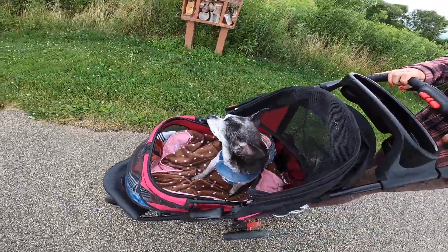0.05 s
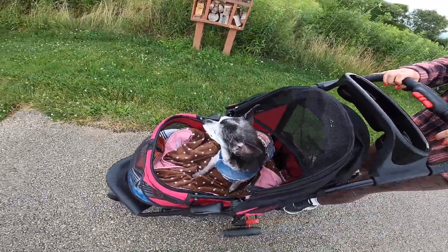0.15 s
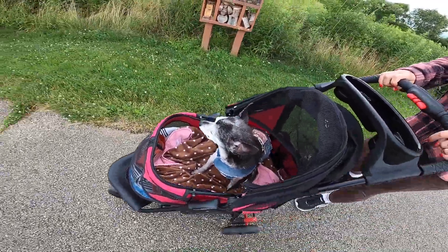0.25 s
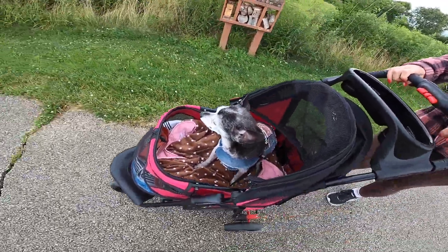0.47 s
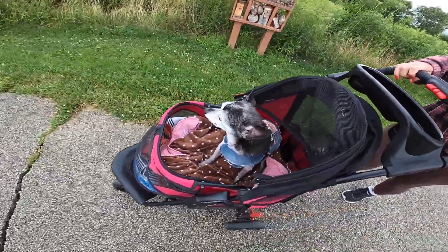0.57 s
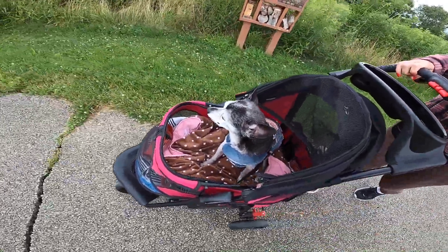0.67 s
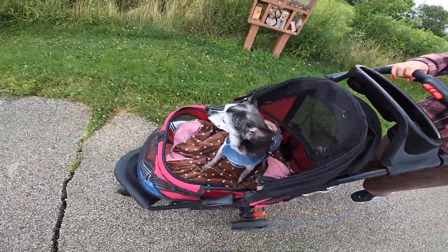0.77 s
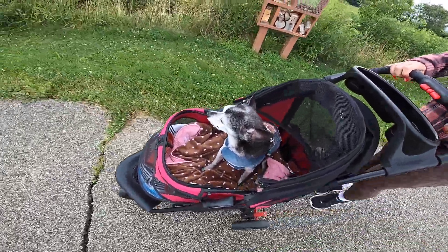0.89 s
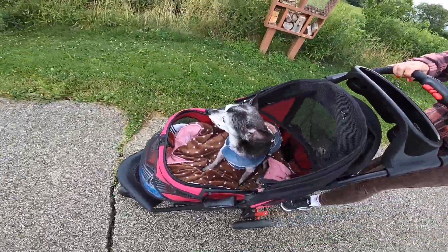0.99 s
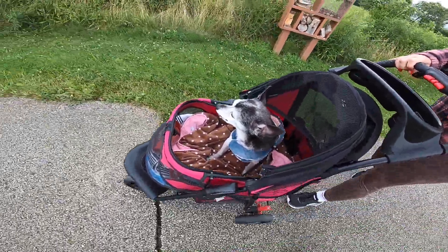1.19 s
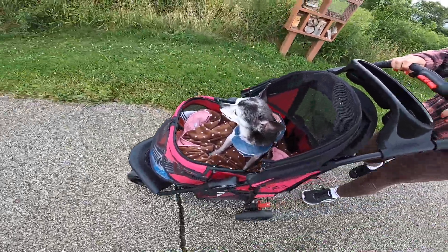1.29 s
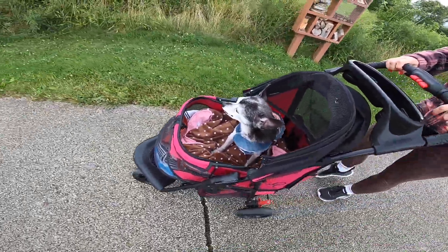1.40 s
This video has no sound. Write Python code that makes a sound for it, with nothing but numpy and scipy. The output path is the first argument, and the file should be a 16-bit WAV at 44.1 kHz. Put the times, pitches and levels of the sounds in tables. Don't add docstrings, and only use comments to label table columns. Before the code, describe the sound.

Light stroller rolling over gritty pavement beside a meadow, heard close and dry on a hand-held microphone: early footstep and insect pulses, a brief bird whistle midway, then wind thumps, rattling ticks, chirps and a duller footfall.

```python
import sys
import numpy as np
from scipy import signal
from scipy.fft import rfft, irfft
from scipy.io import wavfile
from scipy.ndimage import uniform_filter1d, map_coordinates

SR = 44100
rng = np.random.default_rng(int(sys.argv[2]) if len(sys.argv) > 2 else 0)


def invert_db(x):
    u = np.asarray(x, float) / 20
    return 10 ** u


def persist_wave(psi):
    counts = np.round(np.clip(psi, -1, 1) * 32767).astype(np.int16)
    wavfile.write(sys.argv[1], SR, np.atleast_2d(counts).T)


N = 63945

# frequency in Hz, level in dB per Hz.
AIR_COLOUR = [(150, -4.5), (250, 5.5), (313, 0), (897, -16), (1530, -10.5), (5040, -23), (11300, -28),
              (13500, -38.5), (15700, -39)]

# time in seconds, strength in dB, air speed in octaves.
GUSTS = [(0, -35, -0.55), (.185, -43, -0.47), (.235, -32.5, 1.03), (.29, -35, -0.22), (.32, -26.5, 0.48),
         (.44, -26.5, -0.12), (.495, -29.5, 0.21), (.63, -42, -0.23), (.72, -32, -0.23),
         (.755, -12.5, 0.23), (.79, -24.5, 0.55), (.82, -31, -0.24), (.915, -48.5, 0.35),
         (.98, -18, -0.076), (1.05, -20, 1.078), (1.065, -21.5, -0.38), (1.14, -34, -0.42),
         (1.23, -53.5, -0.21)]
# time in seconds, half width in seconds, change in dB.
PUFFS = [(.06, 0.018, -2), (.112, 0.01, 5.5), (0.269, 0.012, -11), (.345, .008, -6), (0.369, 0.0081, 4),
         (0.407, 0.011, -16.5), (0.449, 0.02, 4.5), (.53, 0.015, -2.5), (.595, .012, 1.5),
         (.65, .015, -2.5), (0.701, 0.013, 5.5), (0.737, 0.0071, -11), (.855, 0.017, -7), (.955, .012, 0.5),
         (1.066, 0.0092, -2.5), (1.106, 0.029, 3.5), (1.195, 0.0076, 4.5), (1.33, 0.024, 7.5),
         (1.4, .02, 2)]
# frequency in Hz, level in dB per Hz.
EDDY_COLOUR = [(8, -41), (28, 5), (60, -0.5), (140, -2.5), (260, -16.5), (400, -34.5), (600, -48)]

# time in seconds, level in dB.
INSECT_LEVEL = [
    (0, -70.5),
    (.3, -68),
    (.55, -72.5),
    (.8, -78),
    (1.45, -77),
]
# start in seconds, length in seconds, level in dB.
NEAR_CHIRPS = [
    (0, .014, -57.5),
    (.028, .036, -59.5),
]
# frequency in Hz, level in dB per Hz.
WING_COLOUR = [(8500, -21), (10200, -5.5), (11300, -5), (13200, -12), (14500, -44)]

# start in seconds, level in dB, level of the rising part in dB.
TRILL = [(.029, -56, -60), (.1, -54.5, -58), (.175, -54, -57), (.245, -59, -61), (.321, -60, -62),
         (.396, -61, -68)]
# time in seconds, pitch in Hz.
TRILL_FALL = [(0, 5450), (.008, 5100), (.015, 4450)]
# time in seconds, pitch in Hz.
TRILL_RISE = [(.016, 4900), (.021, 6000), (.025, 6700), (.036, 6900), (.042, 7300), (.048, 8000),
              (.051, 8100)]
# start in seconds, length in seconds, first Hz, last Hz, level in dB.
WHISTLES = [(.613, .012, 1900, 1950, -53), (.97, .01, 3900, 3800, -48), (.093, .028, 4300, 3050, -55),
            (.596, .022, 3100, 3800, -54), (.642, .016, 2300, 2750, -45), (.733, .014, 6000, 6700, -59),
            (.884, .038, 2250, 2200, -50), (.9, .14, 7580, 7400, -67), (.933, .012, 3700, 5150, -40),
            (.9425, .006, 5050, 3600, -41), (1.014, .016, 6100, 4500, -58), (1.066, .028, 7100, 7050, -66),
            (1.074, .052, 3750, 5150, -49), (1.142, .009, 5300, 4600, -52), (1.198, .028, 6350, 4500, -51),
            (1.27, .058, 3700, 5200, -51), (1.343, .01, 5900, 4000, -54), (1.397, .027, 6400, 4700, -56)]
# time in seconds, pitch in Hz, level in dB.
LONG_NOTE = [(.517, 4800, -66), (.528, 4620, -58), (.538, 4520, -52), (.558, 4530, -51), (.58, 4510, -61),
             (.59, 4440, -74)]

# start in seconds, peak in dB, brightest frequency in Hz.
KNOCKS = [
    (.1972, -31, 1590),
    (.2092, -24, 1560),
    (1.289, -32.5, 795),
]
# frequency in Hz, level in dB, time to die by 60 dB in seconds.
SOLE_RING = [(776, -5, 0.068), (1195, -7, .015), (1520, .5, 0.028), (1940, 0.5, 0.013), (2410, 1, 0.013),
             (3330, -0.5, 0.016), (5300, -1.5, 0.018)]
# start in seconds, length in seconds, level in dB.
SCUFFS = [
    (0.173, 0.12, -42.5),
    (1.28, 0.09, -44),
    (0.015, 0.18, -48.5),
]
# frequency in Hz, level in dB per Hz.
DRAG_COLOUR = [(70, -21), (180, 19), (400, -7.5), (780, 3), (1150, -4.5), (2200, -7.5), (5000, -44),
               (8000, -54)]

# start in seconds, peak in dB,
# pitch in Hz.
TICKS = [(.0044, -33, 1650), (0.0279, -37.5, 1360), (.034, -37, 1520), (0.1417, -40, 2090),
         (.169, -43, 5370), (0.1724, -34, 1770), (0.178, -39, 1560), (0.1877, -28.5, 2120),
         (0.2031, -36, 1580), (0.21, -37.5, 5300), (0.212, -33.5, 3000), (0.226, -46, 6440),
         (0.2316, -26, 2260), (0.2422, -39, 1950), (0.2533, -28.5, 2280), (0.2633, -36, 2070),
         (0.272, -40, 1710), (0.275, -44, 3500), (0.2784, -35, 2410), (0.4327, -40, 2190),
         (.4774, -40.5, 3270), (.624, -37.5, 3520), (0.631, -34.5, 3700), (.6707, -31, 2850),
         (.672, -46, 7800), (0.6813, -38, 4240), (0.692, -39, 3360), (0.6986, -30.5, 3660),
         (.7, -42.5, 8300), (0.7147, -29.5, 4160), (.716, -35.5, 1940), (0.7172, -44, 8500),
         (0.7305, -28.5, 4000), (0.7344, -34, 3640), (.7979, -39.5, 2100), (0.817, -40.5, 3820),
         (0.8243, -35.5, 3650), (.826, -44.5, 7940), (.829, -37, 4150), (0.833, -37, 3820),
         (0.8456, -34, 4130), (0.872, -46, 4000), (.919, -48, 3700), (.928, -40, 1660), (.9464, -36, 2400),
         (.953, -31, 3960), (0.968, -34, 3830), (.993, -36, 4230), (1.0379, -37, 3200),
         (1.051, -38.5, 4650), (1.066, -35, 3530), (1.074, -34, 2940), (1.089, -32.5, 3784),
         (1.1142, -31, 3500), (1.116, -34, 2190), (1.1435, -33, 3720), (1.158, -33.5, 2501),
         (1.175, -30, 3358), (1.202, -34.5, 4200), (1.225, -41, 2600),
         (1.289, -40, 2400), (1.297, -36, 1800), (1.313, -26, 3250), (1.313, -31, 1200),
          (1.3135, -41, 5600), (1.3155, -33, 2700), (1.317, -33, 1600), (1.349, -38, 2240),
          (1.358, -36, 1900), (1.364, -34, 1600), (1.387, -38, 2050), (1.424, -40, 2200)]
# start in seconds, peak in dB, pitch in Hz.
BUMPS = [(.212, -43, 760), (.615, -44.5, 327), (.794, -35, 547), (.83, -43, 480), (.87, -40.5, 451.1),
         (1.034, -40, 600), (1.044, -32, 607), (1.288, -46.5, 320), (1.31, -42, 337)]

# time in seconds, load in dB.
WHEEL_LOAD = [(0, -52), (.1, -59), (.3, -57.5), (.52, -64), (.59, -81), (.625, -50.5), (.735, -52.5),
              (.755, -53.5), (.81, -54.5), (.83, -46), (.92, -50.5), (.95, -50), (1, -51.5), (1.02, -58),
              (1.08, -50), (1.18, -47.5), (1.25, -53.5), (1.45, -53.5)]
# frequency in Hz, level in dB per Hz.
TYRE_COLOUR = [(410, -77), (700, 2.5), (1370, -2), (2160, 0.5), (2990, -1.5), (4070, -1.5), (5860, -10),
               (8420, -13.5), (15700, -46)]


def unit(x):
    return x / np.sqrt(np.mean(x ** 2) + 1e-20)


def curves(rows):
    s, *cols = np.transpose(rows)
    return [np.interp(np.arange(N) / SR, s, c) for c in cols]


def wobble(rate):
    return map_coordinates(rng.standard_normal(N // 50), [np.arange(N) * rate / SR])


def rush(spectrum, patchy_db):
    z = signal.stft(rng.standard_normal(N + 8192), nperseg=256)[2]
    field = uniform_filter1d(rng.standard_normal(z.shape), size=5, axis=0)
    field = uniform_filter1d(field, size=5, axis=1)
    x = signal.istft(z * invert_db(patchy_db * unit(field)), nperseg=256)[1]
    f, db = np.transpose(spectrum)
    hz = np.fft.rfftfreq(len(x), 1 / SR)
    colour = invert_db(np.interp(np.log(hz + 1), np.log(f + 1), db, -120, -120))
    return unit(irfft(rfft(x) * colour, len(x))[:N])


def add(out, s, sound):
    part = out[max(round(s * SR), 0):][:len(sound)]
    part += sound[:len(part)]


def swells(rows):
    out = np.zeros(N)
    for s, length, db in rows:
        add(out, s, invert_db(db) * np.hanning(round(length * SR)) ** 0.25)
    return out


def whistle(points, late=1, soft=0.72):
    s, hz = np.transpose(points)
    t = np.arange(s[0], s[-1], 1 / SR)
    swell = np.abs(np.sin(np.pi * np.linspace(0, 1, len(t)) ** late)) ** soft
    return np.sqrt(2) * swell * np.sin(2 * np.pi * np.cumsum(np.interp(t, s, hz)) / SR)


def still_air():
    return invert_db(-53.5) * rush(AIR_COLOUR, patchy_db=3.0)


def wind():
    trim_db, eddy_rate, eddy_db = 0.5, 35, 2.5
    membrane_top = 0.38
    gust_db, speed = curves(GUSTS)
    t = np.arange(N) / SR
    for s, width, db in PUFFS:
        gust_db = gust_db + db * np.exp(-((t - s) / width) ** 2)
    frozen = rush([(4 * hz, db) for hz, db in EDDY_COLOUR], patchy_db=0)
    place = np.cumsum(2 ** np.clip(speed, -2, 2)) / 4
    gain = invert_db(gust_db + trim_db + eddy_db * wobble(eddy_rate))
    push = gain * map_coordinates(frozen, [place])
    return membrane_top * np.tanh(push / membrane_top)


def insect():
    pulses_per_s, first_s, sharpness = 23.2, .024, 2
    level_db, = curves(INSECT_LEVEL)
    t = np.arange(N) / SR
    beat = np.abs(np.cos(np.pi * pulses_per_s * (t - first_s))) ** sharpness
    return (invert_db(level_db) * beat + swells(NEAR_CHIRPS)) * rush(WING_COLOUR, patchy_db=1.5)


def long_whistle():
    note_hz, note_db = curves([(0, 4800, -120)] + LONG_NOTE + [(.6, 4440, -120)])
    start_s = LONG_NOTE[0][0]
    inside, = curves([(start_s - .002, 0), (start_s, 1)])
    return np.sqrt(2) * inside * invert_db(note_db) * np.sin(2 * np.pi * np.cumsum(note_hz) / SR)


def birds():
    trim_db, echo_db, echo_t60_s = -0.5, -12, .15
    calls, u = np.zeros(N), np.linspace(0, 1, 12)
    for s, fall_db, rise_db in TRILL:
        add(calls, s, invert_db(fall_db) * whistle(TRILL_FALL))
        add(calls, s + TRILL_RISE[0][0], invert_db(rise_db) * whistle(TRILL_RISE, soft=.3))
    for s, length, first, last, db in WHISTLES:
        settles = 0 <= first - last < 400
        bend, late = (.3, .8) if settles else (1.9, 1.25)
        points = np.transpose([u * length, first + (last - first) * u ** bend])
        add(calls, s, invert_db(db + trim_db) * whistle(points, late))
    song = long_whistle() + calls * invert_db(1.8 * wobble(150))
    t = np.arange(SR // 5) / SR
    tail = rng.standard_normal(len(t)) * invert_db(-60 * t / echo_t60_s)
    echo = signal.fftconvolve(song, tail / np.linalg.norm(tail))[:N]
    return song + invert_db(echo_db) * echo


def steps():
    crack_share, crack_t60_s = 1.1, 0.049
    focus_db = 6
    out, t = np.zeros(N), np.arange(SR // 10) / SR
    grit = rush(DRAG_COLOUR, patchy_db=0) + .35 * rush(TYRE_COLOUR, patchy_db=0)
    for s, db, bright_hz in KNOCKS:
        ring = np.zeros(len(t))
        for hz, mode_db, t60 in SOLE_RING:
            mode_db = mode_db - focus_db * abs(np.log2(hz / bright_hz))
            ring += invert_db(mode_db - 60 * t / t60) * np.sin(2 * np.pi * hz * t)
        crack = crack_share * grit[round(s * SR):][:len(t)] * invert_db(-9 - 60 * t / crack_t60_s)
        add(out, s, invert_db(db) * (1 - np.exp(-t / .0007)) * (ring + crack))
    drag = swells(SCUFFS) * invert_db(2.5 * wobble(120)) * rush(DRAG_COLOUR, patchy_db=1.2)
    return out + drag


def ticks():
    ring_share, ring_t60_s = .45, .013
    crack_share, crack_t60_s = .5, .012
    pitch_spread, smear_s = .14, .0014
    out, t, grit = np.zeros(N), np.arange(SR // 40) / SR, rush(TYRE_COLOUR, patchy_db=1)
    for s, db, hz in TICKS + BUMPS:
        scatter = pitch_spread * np.linspace(-1, 1, 4) + .05 * rng.standard_normal(4)
        pitch = hz * np.exp(scatter)[:, None]
        age = np.maximum(t - smear_s * rng.random((4, 1)), 0)
        fade = (1 - np.exp(-age / .0003)) * invert_db(-60 * age / ring_t60_s * np.sqrt(hz / 2500))
        ring = ring_share * (fade * np.sin(2 * np.pi * pitch * age)).sum(0)
        puff = (1 - np.exp(-t / .0005)) ** 2 * invert_db(-60 * t / crack_t60_s)
        crack = crack_share * min(hz / 4000, 1) ** 2 * puff * grit[round(s * SR):][:len(t)]
        add(out, s, invert_db(db) * (ring + crack))
    return out


def grit_grains():
    middle_hz, spread, cycles, scatter_db = 3100, .36, 7, 3
    when, size = rng.random((700, 2)).T
    hz = middle_hz * np.exp(spread * rng.standard_normal(len(when)))[:, None]
    k = np.arange(256)
    loudness = invert_db(-scatter_db * np.log(size + .025))[:, None]
    fade = (1 - np.exp(-k / 6)) * np.exp(-2 * k / SR * hz / cycles)
    grains = loudness * fade * np.sin(2 * np.pi * hz * k / SR)
    places = (when * N).astype(int)[:, None] + k
    return unit(np.bincount(places.ravel(), grains.ravel())[:N])


def wheels():
    hiss_db, grit_db = -4, -6
    crackle_rate, crackle_db = 150, 2.5
    load_db, = curves(WHEEL_LOAD)
    crackle = invert_db(crackle_db * wobble(crackle_rate) + 1.2 * wobble(45))
    hiss = unit(crackle * rush(TYRE_COLOUR, patchy_db=1.5))
    return invert_db(load_db) * (invert_db(grit_db) * grit_grains() + invert_db(hiss_db) * hiss)


def scene():
    return (still_air() + wind() + insect() + birds() + steps() + ticks() + wheels())[None]


def top_cut(x):
    return signal.sosfilt(signal.butter(12, 15620, fs=SR, output="sos"), x)


def record(dry):
    return top_cut(dry)


dry = scene()
out = record(dry)
persist_wave(out)
```